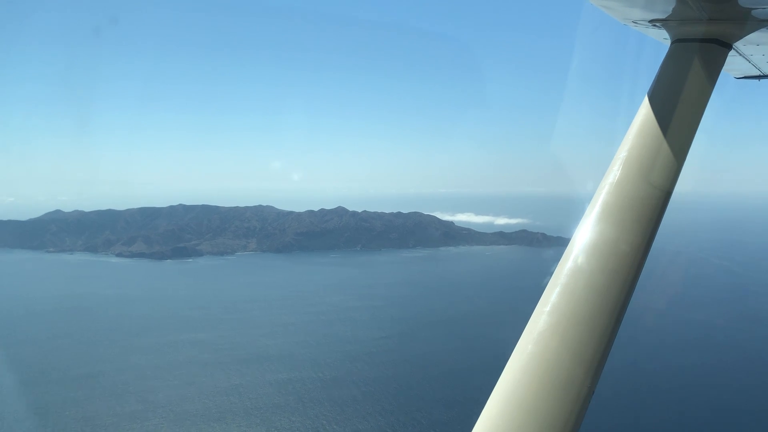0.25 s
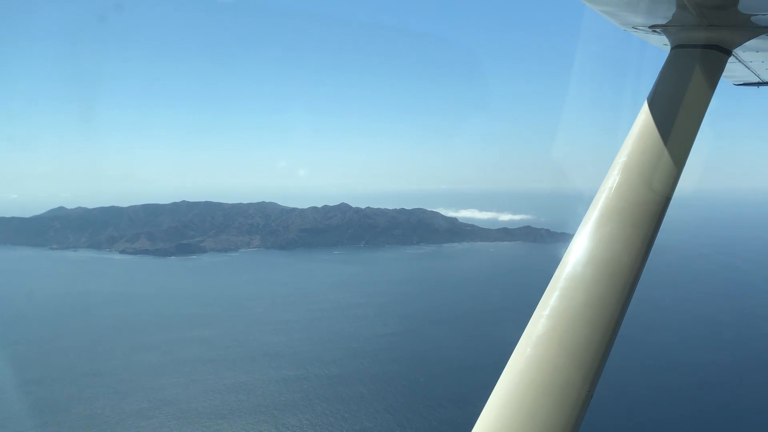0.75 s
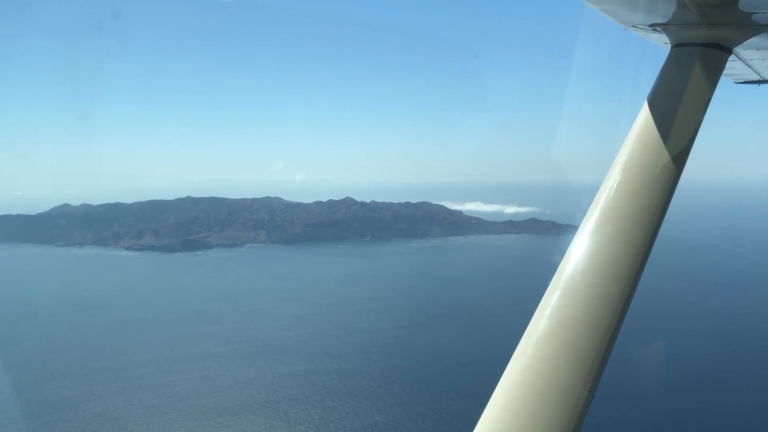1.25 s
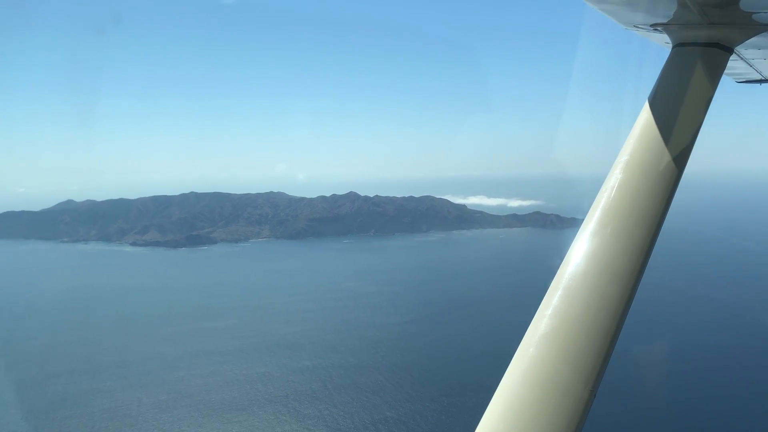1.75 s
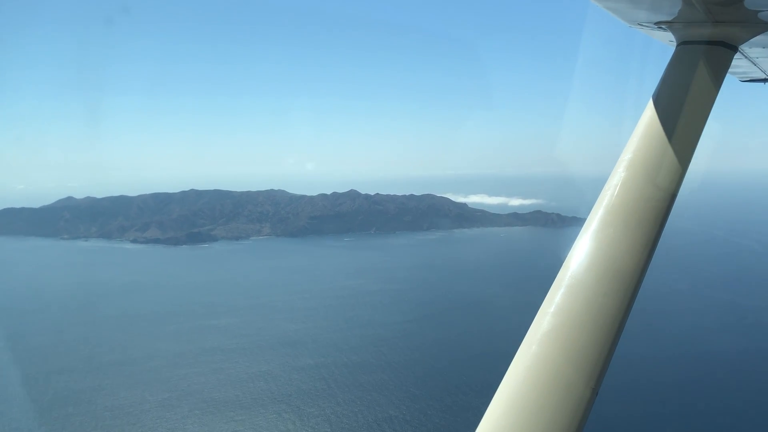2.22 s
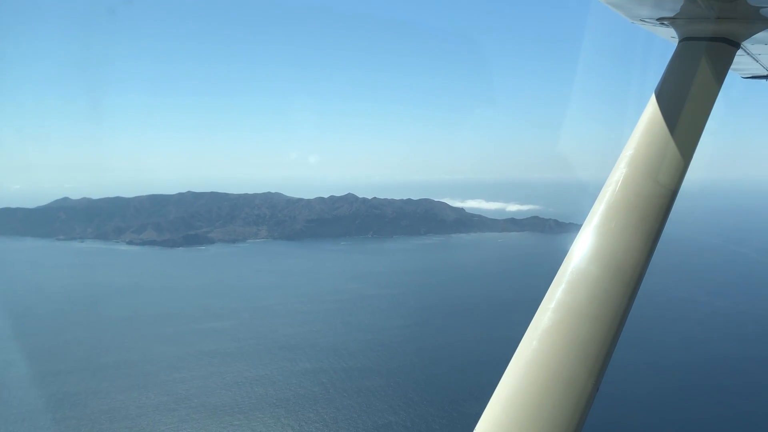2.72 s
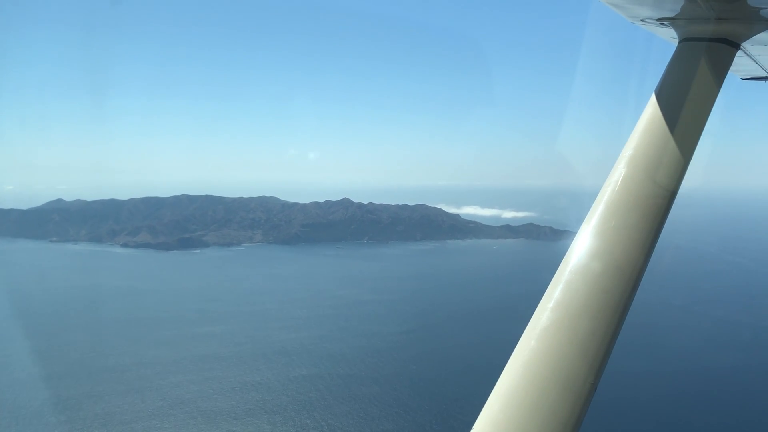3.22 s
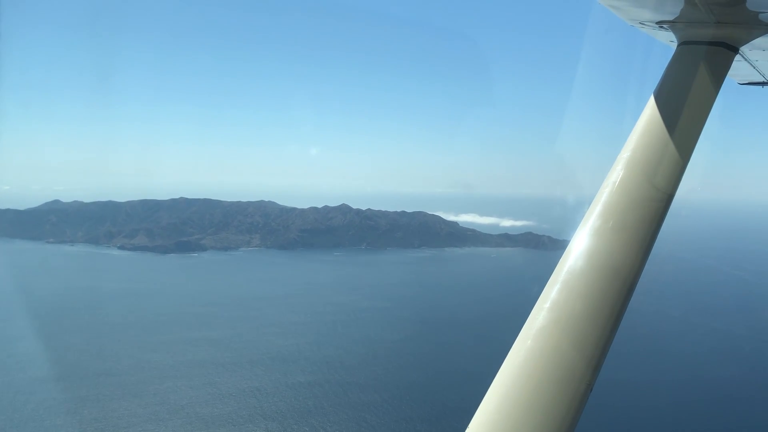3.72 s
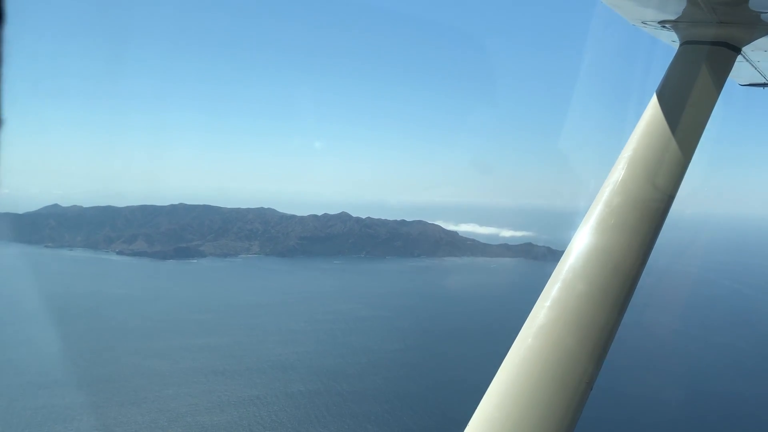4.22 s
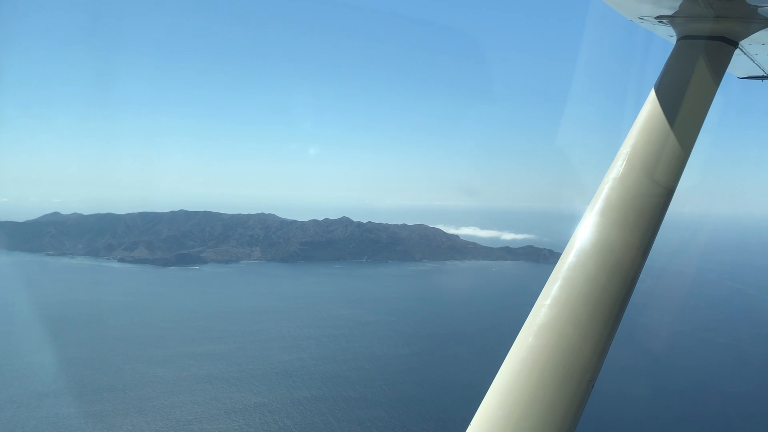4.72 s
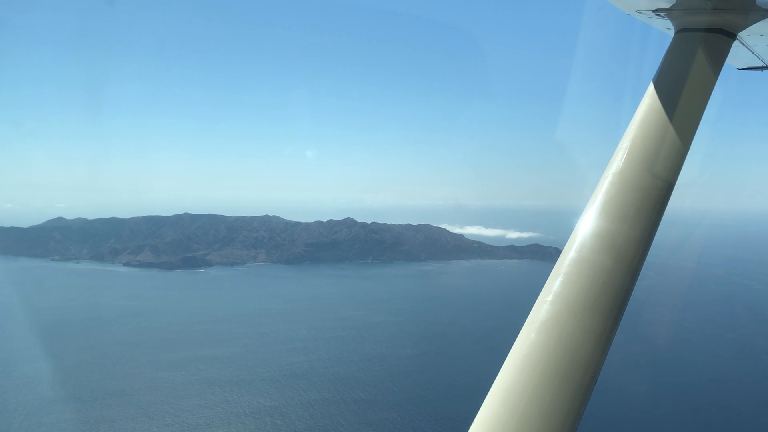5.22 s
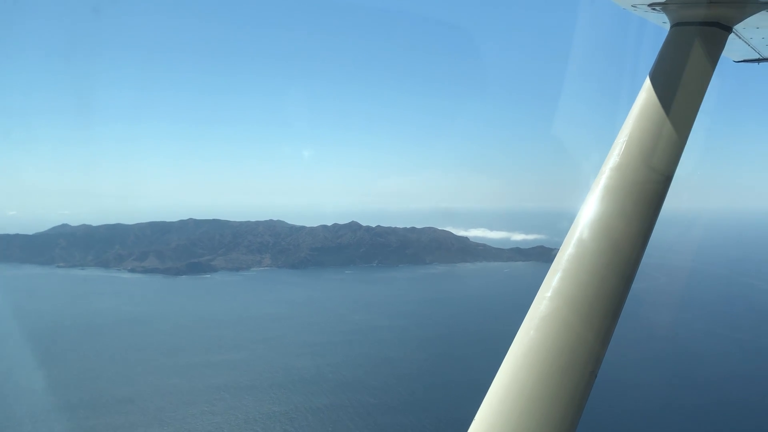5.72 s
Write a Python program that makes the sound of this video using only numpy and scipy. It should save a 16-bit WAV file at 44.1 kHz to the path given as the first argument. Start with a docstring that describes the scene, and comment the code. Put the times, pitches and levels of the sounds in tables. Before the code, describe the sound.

Small propeller plane in level cruise, heard close up from the passenger's window seat by a camera's built-in microphone. A deep, throbbing engine and propeller drone holds nearly one pitch throughout, mixed with low wind roar on the shell, boomy cabin resonance and thin hiss from the seals. It swells slightly early, then sags almost imperceptibly midway and recovers.

```python
"""Small propeller plane in level cruise

Inside the cabin, at the passenger's window, with the camera's microphone.
Engine and propeller drone as cosines on the multiples of one four-stroke cycle: a swell, then a small sag.
The slipstream buffets the shell and air hisses past the seals, both as shaped noise.
The cabin's resonances boom as noise in narrow bands."""
import sys
import numpy as np
from scipy import signal
from scipy.fft import rfft, irfft
from scipy.io import wavfile

SR = 44100
rng = np.random.default_rng(int(sys.argv[2]) if len(sys.argv) > 2 else 0)


def file_out(sig):
    """Save sig as 16-bit WAV at sys.argv[1]."""
    # one column per channel
    cols = np.atleast_2d(sig).T
    # limit, then scale
    lim = np.clip(cols, -1, 1)
    pcm = np.round(lim * 32767).astype(np.int16)
    wavfile.write(sys.argv[1], SR, pcm)


N = 262395


def gain_of(db):
    """Decibels to amplitude."""
    return 10 ** (np.asarray(db) / 20)


def evened(x):
    """Scaled to rms 1."""
    return x / np.sqrt(np.mean(x ** 2) + 1e-20)


def spectrum(points):
    """Amplitude per root Hz at every frequency bin; beyond the table it falls 12 dB an octave."""
    hz = np.fft.rfftfreq(N, 1 / SR) + 1e-3
    table_hz, table_db = np.transpose(points)
    density_db = np.interp(np.log(hz), np.log(table_hz), table_db)
    skirts = np.minimum(hz / table_hz[0], 1) * np.minimum(table_hz[-1] / hz, 1)
    return gain_of(density_db) * skirts ** 2


def noise(density):
    """Turbulent noise with the given amplitude per root Hz."""
    white = rng.standard_normal(N)
    return irfft(rfft(white) * density, N) * np.sqrt(SR / 2)


def wander(rate_hz, size=2048):
    """Smooth chance of rms 1, mostly slower than the rate."""
    hz = np.fft.rfftfreq(size, N / SR / size)
    lowpass = np.exp(-(hz / rate_hz) ** 2) * (hz > 0)  # no steady part
    slow = irfft(rfft(rng.standard_normal(size)) * lowpass)
    return np.interp(np.linspace(0, size - 1, N), np.arange(size), evened(slow))


def arch(peak_s, rise_s, fall_s):
    """A smooth rise from 0 to 1 and back, at every sample."""
    corners_s = [peak_s - rise_s, peak_s, peak_s + fall_s]
    ramp = np.interp(np.arange(N) / SR, corners_s, [0, 1, 0])
    return np.sin(np.pi / 2 * ramp) ** 2


# Air leaking past the seals. Each row: frequency in Hz, power density in dB per Hz.
SEAL_HISS = [(2000, -87), (3100, -76), (3500, -75), (4000, -74.5), (4500, -76.5), (5300, -75.5),
             (6200, -78.5), (7600, -80), (8200, -78.5), (9000, -82), (9900, -85), (10800, -83.5),
             (13200, -87), (16000, -87.6)]


def seal_hiss(flicker_db=0.28, flicker_hz=25.):
    """Thin jets of air at the door and window edges hiss as flickering noise."""
    return noise(spectrum(SEAL_HISS)) * gain_of(flicker_db * wander(flicker_hz))


# Resonances of cabin air and panels.
# Each row: centre in Hz, offset in Hz at which it is 12 dB down, peak power density in dB per Hz.
CABIN_MODES = [(197.4, 15, -40), (432.3, 13.6, -51.5), (512.3, 32, -48), (1497, 130, -67),
               (2064, 250, -69.5), (2500, 51, -70.5), (2670, 250, -74.5)]


def cabin_boom():
    """Turbulence keeps the cabin's resonances ringing, each a narrow band of noise."""
    hz = np.fft.rfftfreq(N, 1 / SR)
    power = np.zeros(len(hz))
    for centre_hz, width_hz, peak_db in CABIN_MODES:
        power += gain_of(peak_db) ** 2 / (1 + ((hz - centre_hz) / width_hz) ** 2) ** 4
    return noise(np.sqrt(power))


# Slipstream on the shell. Each row: frequency in Hz, power density in dB per Hz.
SHELL_BUFFET = [(20, -84), (28, -75), (37, -57), (60, -48), (100, -44), (160, -43.5), (230, -49),
                (290, -47), (390, -52), (600, -55), (800, -58.5), (1550, -65.5), (2200, -70), (3200, -82)]


def slipstream(cycles, gust_db=0.41, gust_hz=6., throb=0.025):
    """Turbulence on the shell: a broad roar that throbs faintly with each turn of the propeller."""
    wash = 1 + throb * np.cos(2 * np.pi * 2 * cycles)  # two turns a cycle
    gusts = gain_of(gust_db * wander(gust_hz))
    return noise(spectrum(SHELL_BUFFET)) * wash * gusts


# The engine sags once and recovers. In order: deepest at in seconds, onset in seconds, recovery in seconds.
ENGINE_SAG = (3.4, .7, 1.2)
CRUISE_HZ = 20.914  # four-stroke cycles a second; one cycle is two turns of the shaft
SAG_HZ = 0.07  # cycle rate lost at the bottom of the sag


def engine_cycles():
    """Running count of engine cycles: the sum of a rate that dips in the sag."""
    return np.cumsum(CRUISE_HZ - SAG_HZ * arch(*ENGINE_SAG)) / SR


# Propeller blades and exhaust beats. Each row: multiple of the cycle rate, rms level in dB.
DRONE_PARTIALS = [(2, -43.9), (4, -37.9), (5, -35.7), (6, -22.4), (7, -45.6), (8, -22.8), (9, -42.6),
                  (10, -32.5), (11, -39.4), (12, -21.7), (13, -41.3), (14, -35.2), (15, -41.9), (16, -30.0),
                  (18, -48.5), (19, -47.2), (20, -41.8), (21, -39.4), (22, -45.8), (23, -34.7), (24, -41.9),
                  (25, -31.0), (26, -41.7), (27, -48.6), (28, -41.4), (29, -48.4), (30, -36.1), (32, -40.5),
                  (34, -52.1), (35, -50.0), (36, -37.8), (40, -50.0), (44, -58.1), (48, -53.7), (53, -53.0)]
# The drone swells once. In order: fullest at in seconds, rise in seconds, fall in seconds.
DRONE_SWELL = (1.53, 1.7, 2.3)
# What the swell does to some partials. Each row: multiple of the cycle rate, change in dB.
SWELLING_PARTIALS = [(6, 1.3), (8, 2.3), (12, 1.3), (16, 2.0), (23, 4.4), (25, -3.3), (36, 4.2)]
SAG_DB = -0.3  # level change of the drone at the bottom of the sag


def drone(cycles, flutter=0.051, flutter_hz=6.2, jitter_cycles=0.00083, jitter_hz=4.4,
          drift_db=0.1, drift_hz=1.1):
    """Blade and exhaust pulses locked to the shaft; rough air shakes them and each partial drifts."""
    shaken = cycles + jitter_cycles * wander(jitter_hz)
    swell, sag = arch(*DRONE_SWELL), arch(*ENGINE_SAG)
    # taking off the mean keeps the average level in dB at the table's
    swell_db = {round(multiple): db * (swell - swell.mean()) for multiple, db in SWELLING_PARTIALS}
    partials = np.zeros(N)
    for multiple, rms_db in DRONE_PARTIALS:
        k = round(multiple)
        # four blade passes and six firings a cycle push in step; the other shaft orders even out the throb
        lag = 0 if k % 4 == 0 or k % 6 == 0 else 0.5
        # the cabin scatters short waves most; odd multiples, from unequal cylinders, fall anywhere
        scatter = 1 if k % 2 else min(k / 36, 1)
        phase = k * shaken + lag + scatter * (rng.random() - 0.5)
        level = gain_of(rms_db + swell_db.get(k, 0) + drift_db * wander(drift_hz))
        strength = level * (1 + flutter * wander(flutter_hz))
        partials += strength * np.cos(2 * np.pi * phase)
    sag_gain = gain_of(SAG_DB * (sag - sag.mean()))
    return np.sqrt(2) * sag_gain * partials  # root 2 takes rms to peak


def scene():
    """The rushing air and the drone at the passenger's window."""
    cycles = engine_cycles()
    air = seal_hiss() + cabin_boom() + slipstream(cycles)
    return (air + drone(cycles))[None]


def record(dry):
    """The camera rounds off the highest peaks and limits the band."""
    ceiling, edge_hz = gain_of(-4.0), 15800
    rounded = dry / (1 + (dry / ceiling) ** 8) ** (1 / 8)
    lowpass = signal.firwin(511, edge_hz, window=("kaiser", 9), fs=SR)
    return signal.oaconvolve(rounded, lowpass[None], "same")


dry = scene()
out = record(dry)
file_out(out)
```